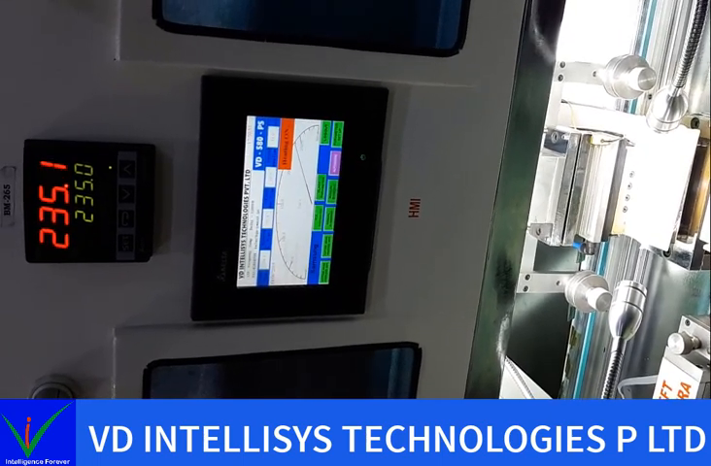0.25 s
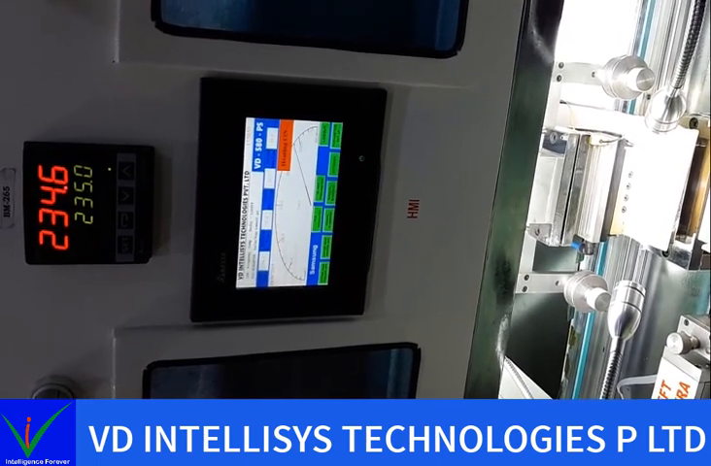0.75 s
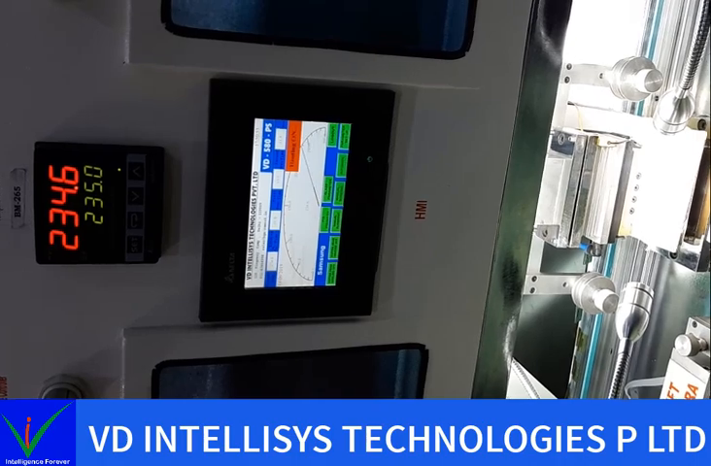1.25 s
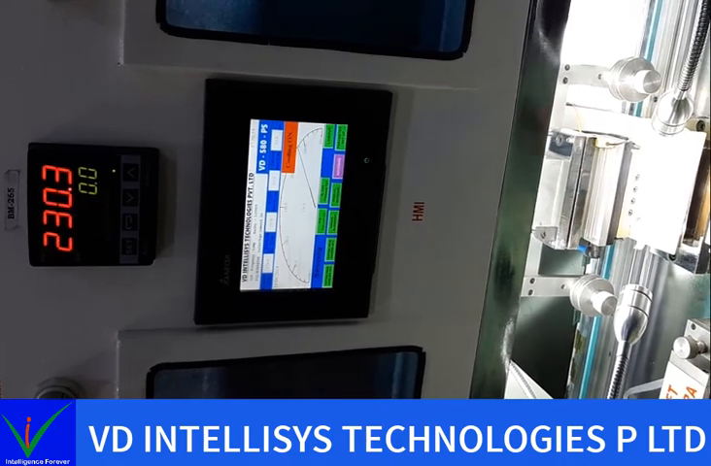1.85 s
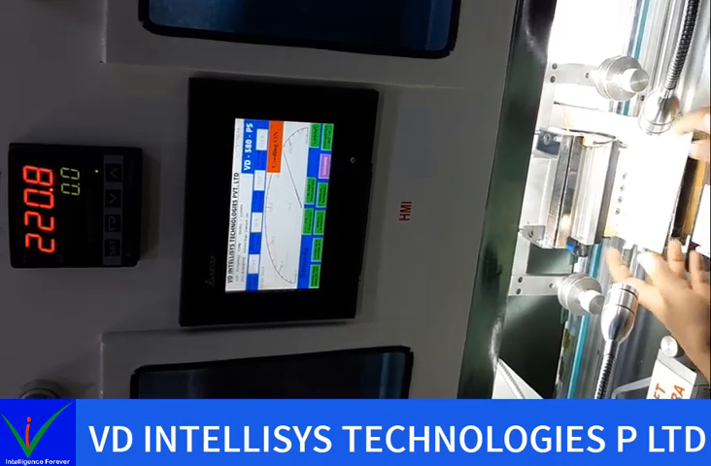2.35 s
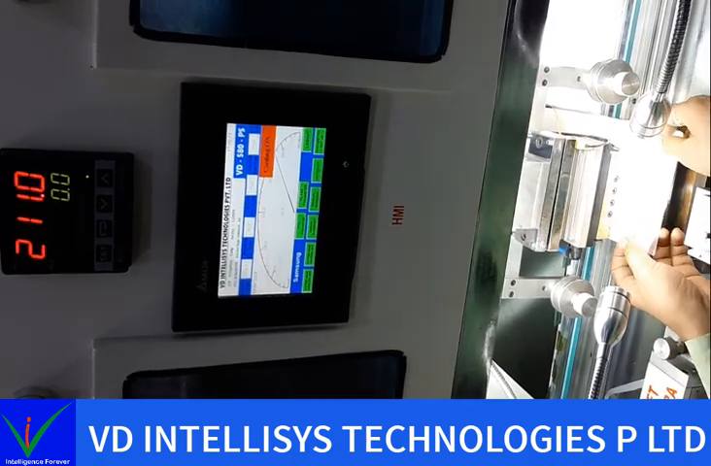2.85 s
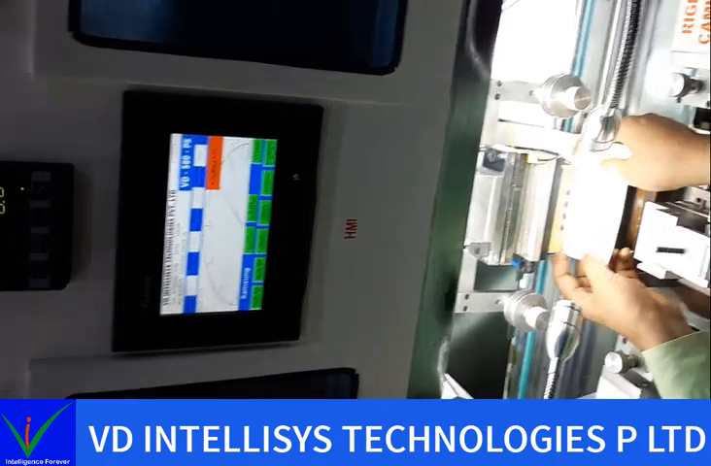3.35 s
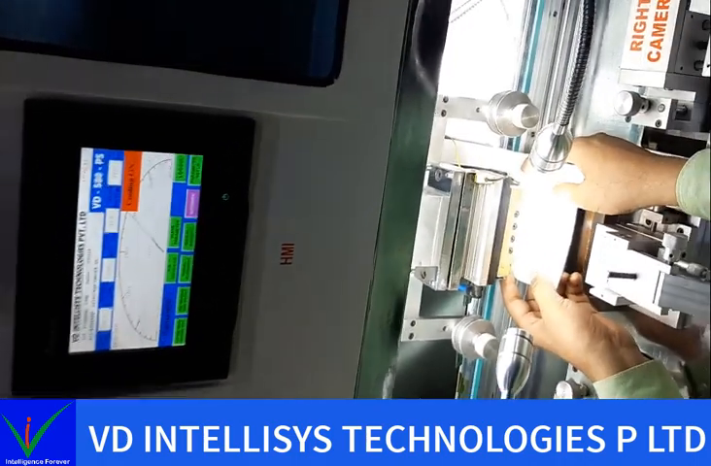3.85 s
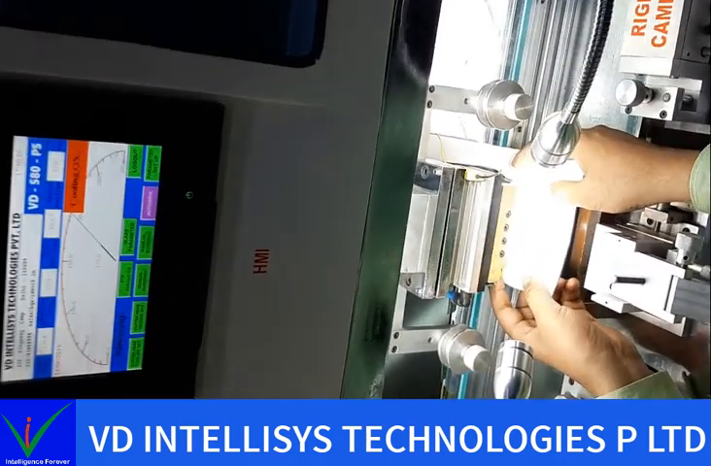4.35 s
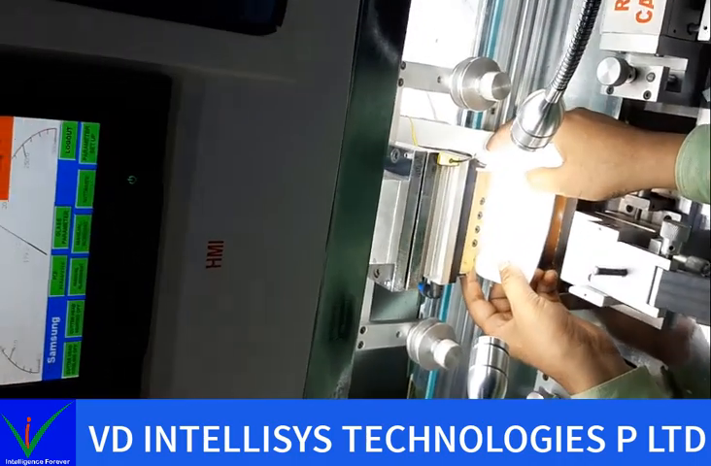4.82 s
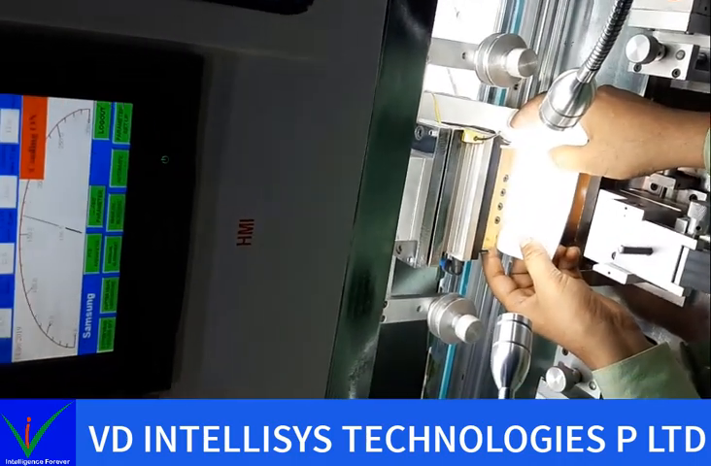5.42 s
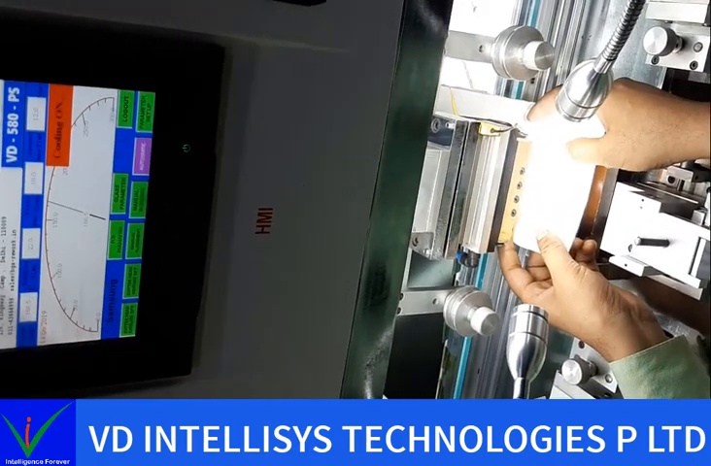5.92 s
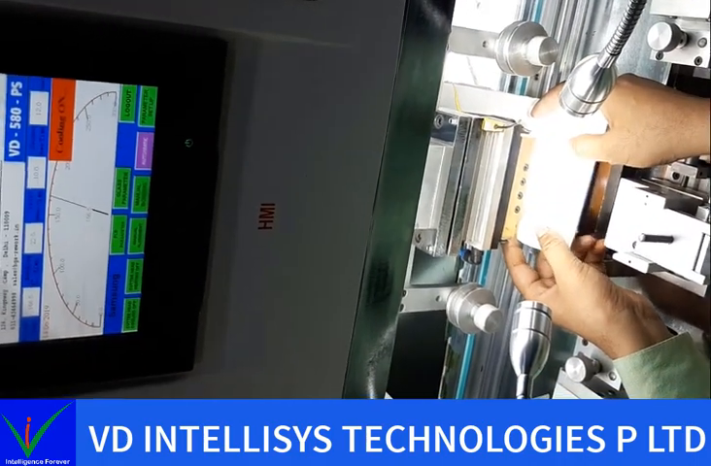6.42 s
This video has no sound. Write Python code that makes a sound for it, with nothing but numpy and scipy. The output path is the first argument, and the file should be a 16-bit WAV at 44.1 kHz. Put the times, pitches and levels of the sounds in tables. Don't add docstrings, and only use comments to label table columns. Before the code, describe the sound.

After a second of machine hum, an air valve snaps open and a piercing, breathy hiss of compressed air rushes on without stopping.

```python
import sys
import numpy as np
from scipy import signal
from scipy.io import wavfile
from scipy.ndimage import uniform_filter1d, minimum_filter1d

SR = 44100
rng = np.random.default_rng(int(sys.argv[2]) if len(sys.argv) > 2 else 0)


def output_pcm(signal):
    pcm = np.clip(np.atleast_2d(signal).T, -1, 1) * 32767
    wavfile.write(sys.argv[1], SR, np.round(pcm).astype(np.int16))


def elevation(decibels):
    levels = np.asarray(decibels, float)
    return 10 ** (levels / 20)


N = 294588
FRAME = 1024
HOP = FRAME // 4
HZ = np.maximum(np.fft.rfftfreq(FRAME, 1 / SR), 1)[:, None]

# (time [s], strength [dB], hiss [dB])
JET_LEVEL = [(1.02, -18.5, -9), (1.08, -25.5, .7), (1.372, -26, -2), (1.385, -28.5, -1), (1.8, -31, 1.3),
             (2.0, -28, -1.3), (2.3, -29, -0.3), (2.7, -23, -0.5), (2.95, -19, -1.6), (3.3, -19, 1.5),
             (3.7, -18, .3), (4.1, -18, 0.1), (4.6, -18, 0.6), (5.1, -17.5, .3), (5.46, -18, 1.4),
             (5.52, -19.5, 0.7), (6.0, -18.5, 0.1), (6.68, -17.5, -0.5)]
# (time [s], level [dB])
VALVE_OPENING = [
    (.86, -54),
    (.95, -28),
    (.997, -8.5),
    (.9995, -3),
    (1.004, -8),
    (1.0075, -11),
    (1.0082, 5),
    (1.011, -4),
    (1.02, -1.5),
]
# (width [Hz], level [dB])
GAP_RESONANCES = [
    (192, 0),
    (183, -2),
    (359, -11.5),
    (294, -12.5),
]
# (ratio [1], width [Hz], level [dB])
OVERTONE_RESONANCES = [
    (0.999, 475, 2.5),
    (1.3, 600, -7.5),
]
# (frequency [Hz], width [Hz], level [dB])
FIN_RINGS = [(5550, 210, -4), (6560, 120, -5.5), (9690, 660, -3), (11620, 190, -4.5), (14800, 200, -21)]
# (frequency [Hz], level [dB])
HISS_SPECTRUM = [(1500, -70), (2600, -25), (3200, 1.5), (6000, 4), (7800, -1.5), (9500, -0.5), (11500, 2.5),
                 (13000, 3.5), (15600, 2.5)]
# (frequency [Hz], level [dB])
RUSH_SPECTRUM = [(60, -59), (120, -19), (200, -10.5), (330, 2), (550, -7.5), (800, -4.5), (1150, -10),
                 (1400, -13.5), (1900, -57)]
# (time [s], peak [dB])
GUST_PEAKS = [(2.962, -38.5), (3.19, -38), (3.28, -54), (3.391, -31), (3.62, -38), (3.92, -37.5),
              (4.1, -45), (4.15, -37), (4.41, -41), (4.49, -36), (4.63, -41), (4.95, -44.5), (5.18, -38),
              (5.331, -35), (5.55, -43), (5.72, -40), (5.88, -35.5), (6.07, -33.5), (6.24, -41),
              (6.38, -39.5), (6.655, -35)]
# (start [s], end [s], before [Hz], after [Hz])
FIRST_GAP_GLIDE = (3.36, 4.3, 2114, 2021)
SECOND_GAP_GLIDE = (2.95, 3.25, 2622, 2442)
OVERTONE_GLIDE = (2.3, 4.3, 4154, 4006)
# (start [s], end [s], before [dB], after [dB])
SECOND_GAP_LEVEL = (-2, -2.5, -15.5, -4.5)
OVERTONE_GROWTH = (3.2, 4.1, 0.078, 2.85)
# (start [s], end [s], before [dB], after [dB])
DULLING_WHILE_VENTING = (1.14, 1.83, 10, 6.7)
DULLING_AFTER_VENT = (1.86, 2.9, 6, 2.5)
# (start [s], end [s], before [dB], after [dB])
PALM_SHADE = (1.21, 3.1, 20, 0.12)
# (start [s], end [s], before [ms], after [ms])
RIGHT_LAG = (1.4, 6.36, 0.38, 0.47)
# (frequency [Hz], gain [dB], loss per dulling [dB/dB], loss per shade [dB/dB])
RIGHT_PORT = [(273, -0.5, -0.5, 0.5), (600, 1.5, 0, 0.5), (944, 1.5, 0, 0.5), (2010, 5, 2.5, -1),
              (2925, 1, 0.5, -0.5), (3160, -9.5, -2.5, 16), (4150, -6.5, 0.5, 0), (4980, -6, 1, 0.5),
              (5960, -0.5, 4.5, 0), (6500, -28, 3.5, 1.5), (7170, -18, -3.5, 7), (7700, -11, 0, 0),
              (8900, -16.5, -3.5, 3.5), (10000, -1, 1.5, -0.5)]
# (frequency [Hz], likeness [0-1], lead of right port [cycles])
PORT_LIKENESS = [(60, 1, 0.096), (278, 0.88, 0.064), (680, 0.4, 0.35), (1090, 0, -0.083),
                 (1500, 0.05, 0.41), (1670, 0.69, 0.15), (2035, 0.64, 0.21), (2410, 1, -0.12),
                 (2880, 0.76, -0.0061), (3160, 0, -0.23), (4400, 0.54, -0.062), (5300, 0.4, -0.2),
                 (11800, 0, -0.28)]
# (time [s], level [dB])
VENT_BLOW = [
    (.95, -60),
    (.99, -30),
    (1.01, -10.5),
    (1.05, -11),
    (1.372, -11.5),
    (1.384, -14),
    (1.81, -21.5),
    (1.835, -50),
    (1.9, -80),
]
# (frequency [Hz], level [dB])
VENT_SPECTRUM = [(1400, -68), (2500, -48), (3600, -1), (4800, -2.5), (5600, 3), (6700, 5.5), (7300, -0.5),
                 (7800, -7.5), (10000, -5), (15600, -7.5)]
# (time [s], peak [dB])
FINGER_SHIFTS = [(.302, -16.5), (.742, -22), (1.6, -20), (2.1, -26.5), (2.75, -24), (1.25, -23), (3.0, -27),
                 (3.21, -29), (3.9, -29), (4.11, -21), (4.31, -10.5), (5.04, -22.5), (5.54, -17.5),
                 (6.62, -24)]
# (frequency [Hz], level [dB])
RUMBLE_SPECTRUM = [(25, -31), (50, -29), (70, -14), (95, 10.5), (180, -5), (300, -0.5), (500, -22),
                   (900, -80)]
# (time [s], peak [dB])
HUM_SWELLS = [
    (.008, -18),
    (.378, -25.5),
    (.53, -21.5),
    (.76, -22.5),
    (.918, -23),
]
# (frequency [Hz], level [dB])
HUM_SPECTRUM = [(60, -12), (200, -0.5), (350, 1.5), (600, -2.5), (800, 1.5), (1050, -5), (1300, -11.5),
                (1600, -29), (2500, -58), (4000, -80)]
# (frequency [Hz], level [dB])
WHIRR_SPECTRUM = [(600, -40), (1000, -22), (1550, 6), (1900, -0.5), (2700, 3.5), (4300, -2.5), (5100, -7.5),
                  (6100, -2), (7200, -9.5), (8300, -21.5), (13400, -25.5), (14000, -39), (16000, -50)]
# (frequency [Hz], gain [dB])
WHIRR_RIGHT_GAIN = [(1500, 0.5), (2100, -5.5), (2600, -9.5), (3000, -31), (5000, -40), (6000, -50)]
# (time [s], peak [dB], frequency [Hz])
KNOCKS = [
    (.536, -16, 515),
    (.536, -23, 1500),
    (0.556, -11, 540),
]
# (time [s], gain [dB])
GAIN_CONTROL = [
    (1.008, -1),
    (1.013, -21),
    (1.15, -32.5),
    (1.8, -40),
    (2.6, -38),
    (3.2, -31.5),
    (6.68, -33),
]
# (frequency [Hz], level under loudest bright band [dB])
FAINTEST_KEPT = [(40, -44), (130, -40), (250, -46), (700, -42), (950, -35.5), (1350, -27), (1600, -37),
                 (3300, -20.5), (4500, -30), (7000, -31), (9000, -33), (13000, -39), (15500, -31)]


def rms_one(x):
    return x / np.sqrt(np.mean(x ** 2) + 1e-20)


def in_time(rows, t):
    s, *columns = np.transpose(rows)
    return [np.interp(t, s, c) for c in columns]


def ramp(move, t):
    return np.interp(t, move[:2], move[2:])


def surges(steady_db, rows, rise_s, fall_s, t):
    s, db = np.transpose(rows)[:, :, None]
    shape = np.exp(-np.abs(t - s) / np.where(t < s, rise_s, fall_s))
    return np.sqrt(elevation(steady_db) ** 2 + np.sum((elevation(db) * shape) ** 2, axis=0))


def colour(points, column=1):
    p = np.array(points)
    return np.interp(np.log(HZ), np.log(p[:, 0]), p[:, column])


def resonance(hz, width_hz):
    return 1 / (1 + ((HZ - hz ** 2 / HZ) / width_hz) ** 2)


def even(gain):
    return gain / np.sqrt(np.mean(gain ** 2, axis=0, keepdims=True))


def patches(shape, patch_db, shared_db, frames, bins):
    local = uniform_filter1d(rng.standard_normal(shape), int(bins), axis=0)
    local = uniform_filter1d(local, int(frames), axis=1)
    shared = uniform_filter1d(rng.standard_normal(shape[1]), int(frames))
    return elevation(patch_db * rms_one(local) + shared_db * rms_one(shared))


def ports(left_gain, right_gain, lag_ms, alike):
    noise = rng.standard_normal((2, N))
    near, other = signal.stft(noise, nperseg=FRAME, noverlap=FRAME - HOP)[2]
    lag_cycles = HZ * lag_ms / 1000 - colour(PORT_LIKENESS, column=2)
    late = near * np.exp(-2j * np.pi * lag_cycles)
    right = alike * late + np.sqrt(1 - alike ** 2) * other
    cells = np.array([near * left_gain, right * right_gain])
    return signal.istft(cells, nperseg=FRAME, noverlap=FRAME - HOP)[1][:, :N]


def whistle(frames):
    first_hz, second_hz = ramp(FIRST_GAP_GLIDE, frames), ramp(SECOND_GAP_GLIDE, frames)
    second_db = ramp(SECOND_GAP_LEVEL, frames)
    pitches = [(first_hz, 0), (second_hz, second_db), (1.169 * second_hz, second_db), (0.86 * first_hz, 0)]
    gain = sum(elevation(db + against_first_db) * resonance(hz, width_hz)
               for (hz, against_first_db), (width_hz, db) in zip(pitches, GAP_RESONANCES))
    return gain / (1 + (0.51 * first_hz / HZ) ** 12)


def overtones(frames):
    over_hz = ramp(OVERTONE_GLIDE, frames)
    gain = sum(elevation(db) * resonance(ratio * over_hz, width_hz) for ratio, width_hz, db in OVERTONE_RESONANCES)
    return gain / (1 + (2000 / HZ) ** 8)


def hiss():
    rings = sum(elevation(db) * resonance(hz, width_hz) for hz, width_hz, db in FIN_RINGS)
    return elevation(colour(HISS_SPECTRUM)) * (1 + rings)


def jet(t, frames):
    jet_db, fins_db = in_time(JET_LEVEL, frames)
    venting = frames < 1.82
    over_db = ramp(OVERTONE_GROWTH, frames) + 7 * venting
    seep_db = -58.5
    rush_db = 20 * np.log10(elevation(seep_db) + elevation(jet_db - 26))
    gust_db = 20 * np.log10(surges(-90, GUST_PEAKS, rise_s=0.068, fall_s=0.06, t=frames))
    rush = elevation(colour(RUSH_SPECTRUM))
    gust_cut_hz = 750
    layers = [
        (whistle(frames), jet_db + 5),
        (overtones(frames), jet_db - 0.9 + over_db),
        (hiss(), jet_db + 5 + fins_db),
        (rush, rush_db),
        (rush / (1 + (HZ / gust_cut_hz) ** 2), gust_db),
    ]
    left = np.sqrt(sum((even(gain) * elevation(db)) ** 2 for gain, db in layers))
    left = left * patches(left.shape, 1.36, 0.44, frames=4, bins=8.7)
    left = left * patches(left.shape, 0.91, 0.38, frames=44.4, bins=24)

    dulling_db = np.where(venting, ramp(DULLING_WHILE_VENTING, frames), ramp(DULLING_AFTER_VENT, frames))
    dulling_loss_db = colour(RIGHT_PORT, column=2) * dulling_db
    shade_loss_db = colour(RIGHT_PORT, column=3) * ramp(PALM_SHADE, frames)
    right = left * elevation(colour(RIGHT_PORT) - dulling_loss_db - shade_loss_db)
    out = ports(left, right, ramp(RIGHT_LAG, frames), np.clip(colour(PORT_LIKENESS), 0, 1))
    return out * elevation(in_time(VALVE_OPENING, t)[0])


def vent(t):
    gain = even(elevation(colour(VENT_SPECTRUM)))
    return ports(gain, gain * elevation(-45), lag_ms=0.4, alike=0.24) * elevation(in_time(VENT_BLOW, t)[0])


def handling(t):
    gain = even(elevation(colour(RUMBLE_SPECTRUM)))
    level = surges(-35, FINGER_SHIFTS, rise_s=0.079, fall_s=0.089, t=t)
    level = level * elevation(in_time(GAIN_CONTROL, t)[0] + 2)
    return ports(gain, gain * elevation(-9), lag_ms=0.52, alike=0.55) * level


def knocks(t):
    out = np.zeros(N)
    for s, db, hz in KNOCKS:
        age_s = np.maximum(t - s, 0)
        out = out + elevation(db - 60 * age_s / 0.045) * np.sin(2 * np.pi * hz * age_s)
    return out


def workshop(t, frames):
    hum = even(elevation(colour(HUM_SPECTRUM))) * surges(-26, HUM_SWELLS, rise_s=0.1, fall_s=0.1, t=frames)
    whirr = even(elevation(colour(WHIRR_SPECTRUM))) * elevation(-28)
    lumps = patches(hum.shape, 2.5, 1.0, frames=13.3, bins=8)
    lumps = lumps * patches(hum.shape, 2.53, 0.32, frames=30, bins=30)
    left = np.sqrt(hum ** 2 + whirr ** 2) * lumps
    right_hum, right_whirr = hum * elevation(-1.5), whirr * elevation(colour(WHIRR_RIGHT_GAIN))
    right = np.sqrt(right_hum ** 2 + right_whirr ** 2) * lumps
    alike = np.clip(colour(PORT_LIKENESS) * 500 / (HZ + 300), 0, 0.9)
    room = ports(left, right, 0.66, alike) + knocks(t)
    return room * elevation(in_time(GAIN_CONTROL, t)[0])


def scene():
    t = np.arange(N) / SR
    frames = np.arange(-(-N // HOP) + 1) * HOP / SR
    return jet(t, frames) + vent(t) + handling(t) + workshop(t, frames)


def drop_faint_bands(x):
    size, cutoff_hz = 2 * FRAME, 15800
    cells = signal.stft(x, window="cosine", nperseg=size, noverlap=FRAME)[2]
    hz = np.fft.rfftfreq(size, 1 / SR)
    power = uniform_filter1d(np.abs(cells) ** 2, size=7, axis=1)
    power = uniform_filter1d(power, size=2, axis=2)
    loudest = uniform_filter1d(power[:, hz > 1500].max(axis=(0, 1)), size=5)
    mask_db = np.interp(hz, *np.transpose(FAINTEST_KEPT))[:, None]
    wander = patches(power.shape[1:], 6.0, 3.0, frames=2, bins=7)
    faint = power < loudest * elevation(2 * mask_db) * wander
    kept = minimum_filter1d(faint, size=4, axis=1) == 0
    cells = cells * kept * (hz < cutoff_hz)[:, None]
    return signal.istft(cells, window="cosine", nperseg=size, noverlap=FRAME)[1][:, :N]


def low_pass(x):
    return signal.sosfilt(signal.butter(12, 16480, fs=SR, output="sos"), x)


def record(dry):
    mix = drop_faint_bands(np.clip(dry, -1, 1))
    return low_pass(mix)


dry = scene()
out = record(dry)
output_pcm(out)
```